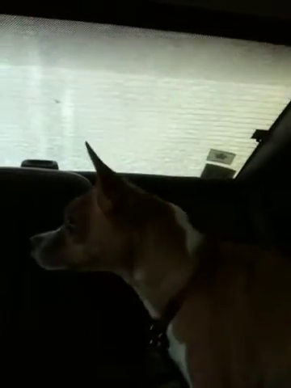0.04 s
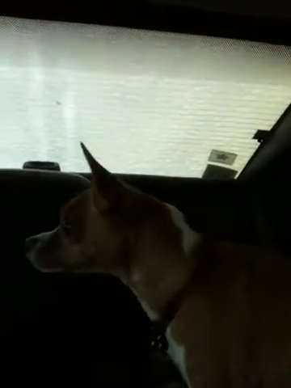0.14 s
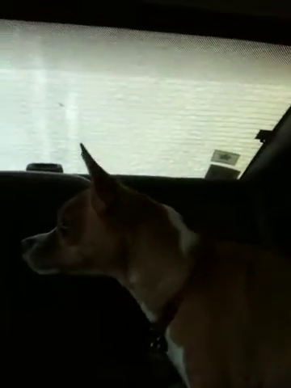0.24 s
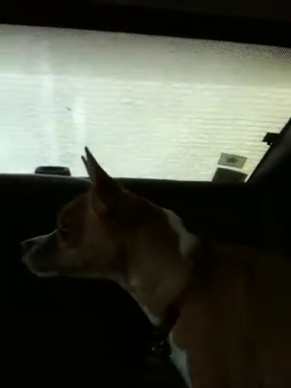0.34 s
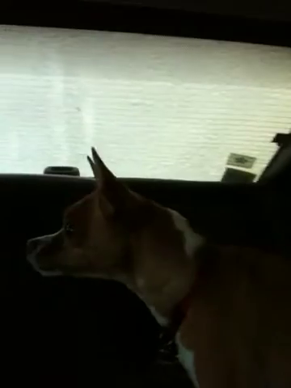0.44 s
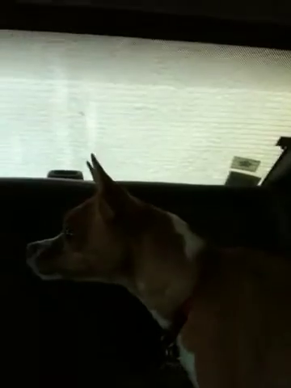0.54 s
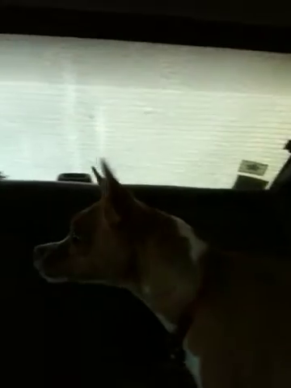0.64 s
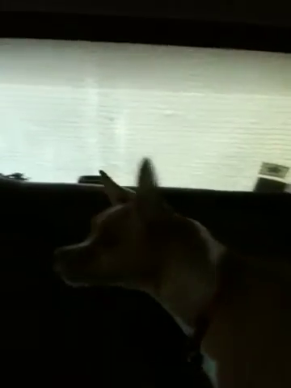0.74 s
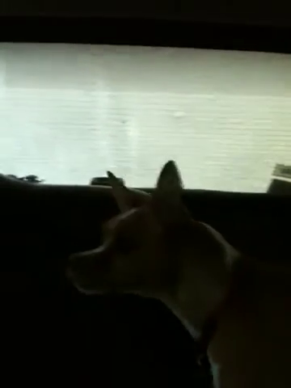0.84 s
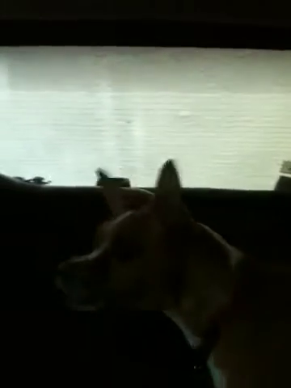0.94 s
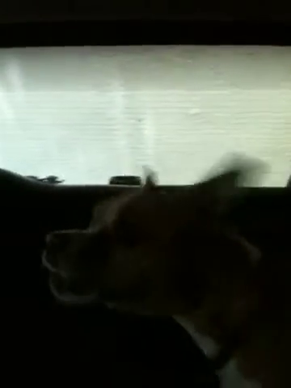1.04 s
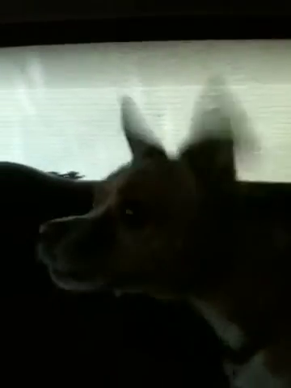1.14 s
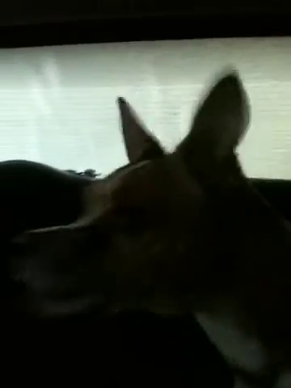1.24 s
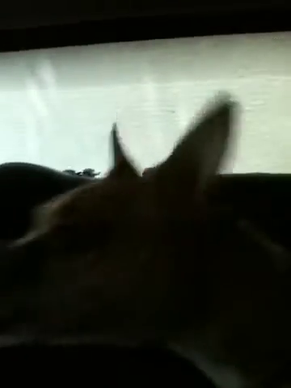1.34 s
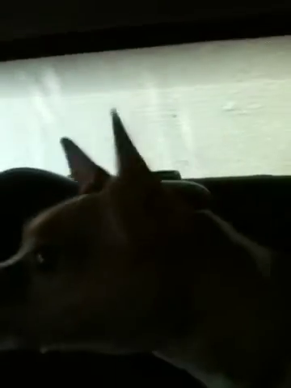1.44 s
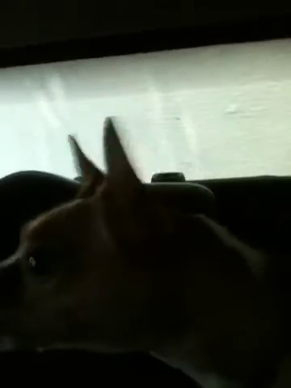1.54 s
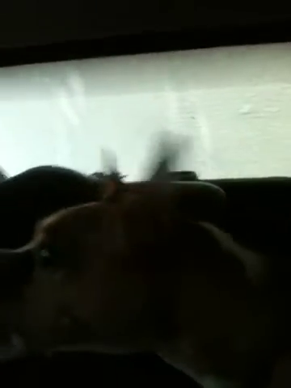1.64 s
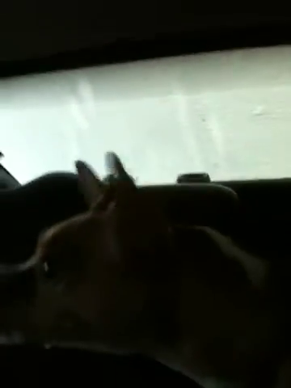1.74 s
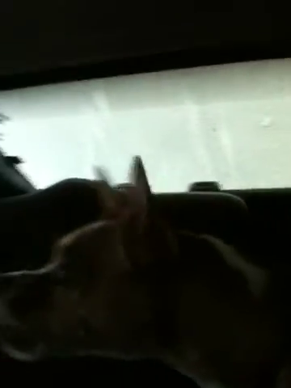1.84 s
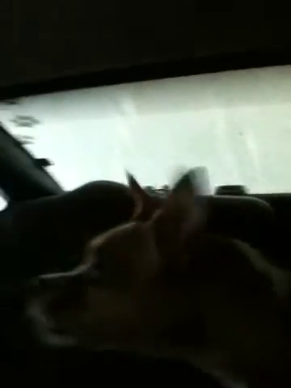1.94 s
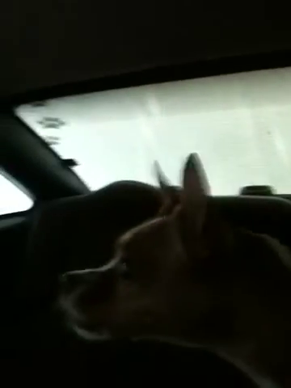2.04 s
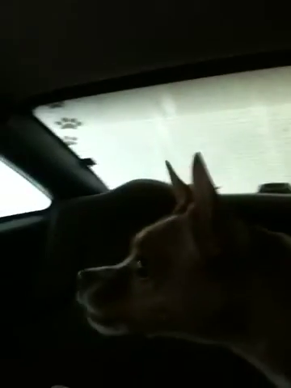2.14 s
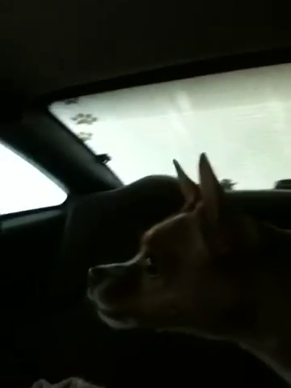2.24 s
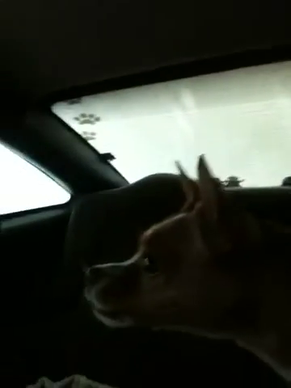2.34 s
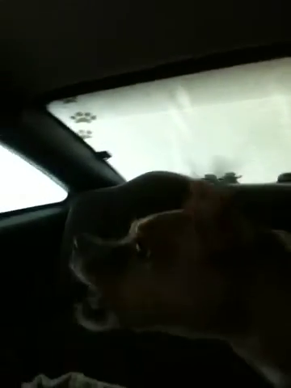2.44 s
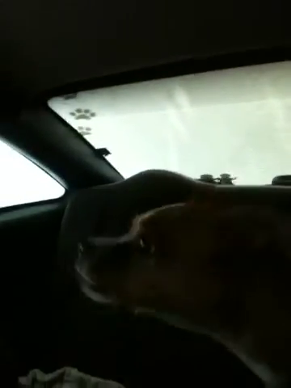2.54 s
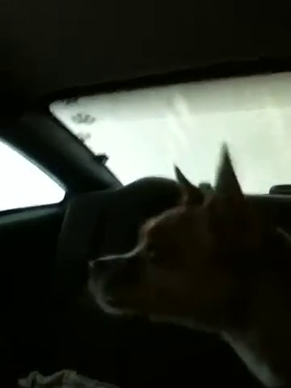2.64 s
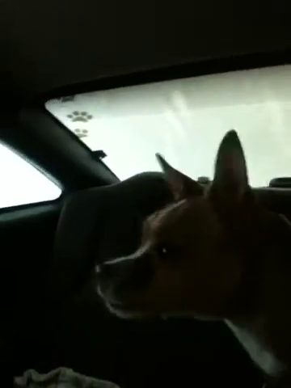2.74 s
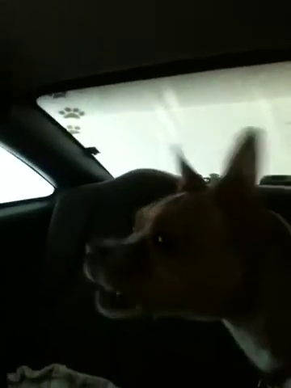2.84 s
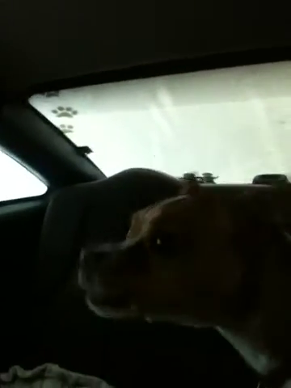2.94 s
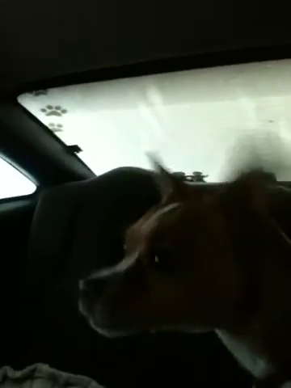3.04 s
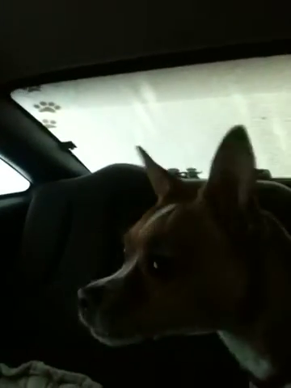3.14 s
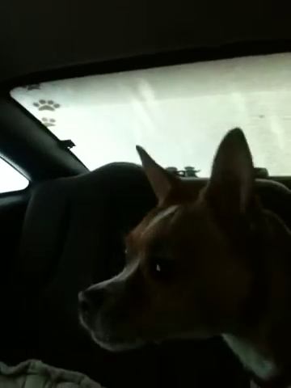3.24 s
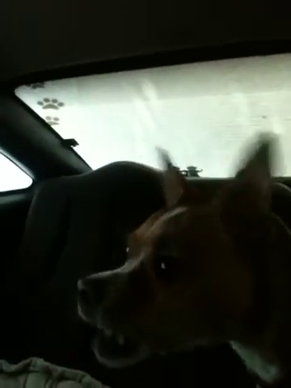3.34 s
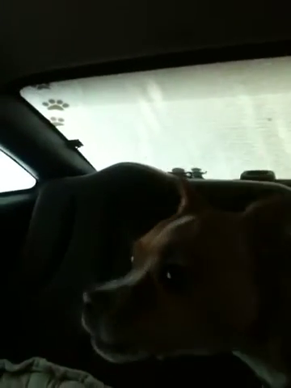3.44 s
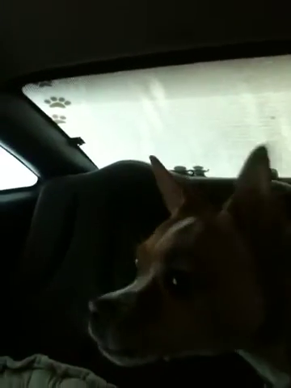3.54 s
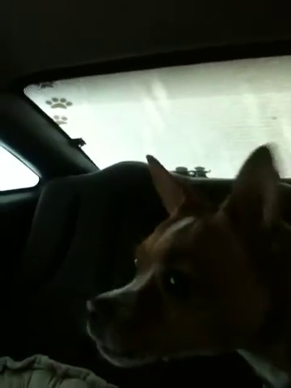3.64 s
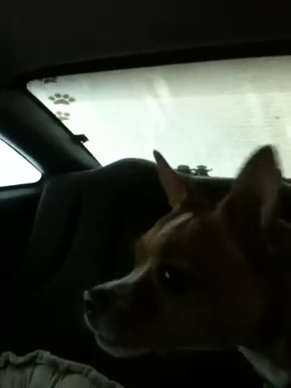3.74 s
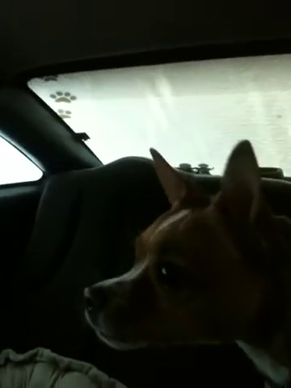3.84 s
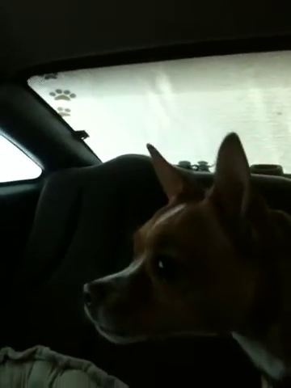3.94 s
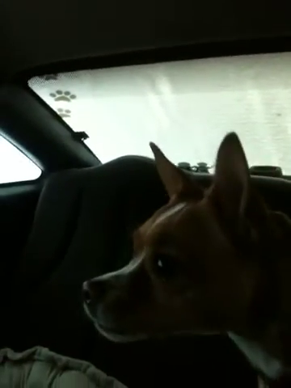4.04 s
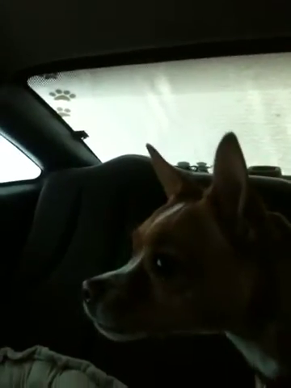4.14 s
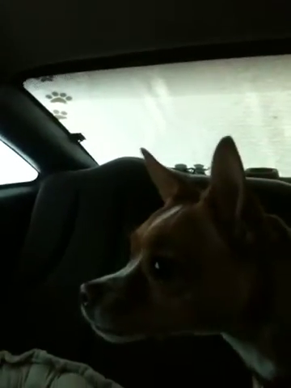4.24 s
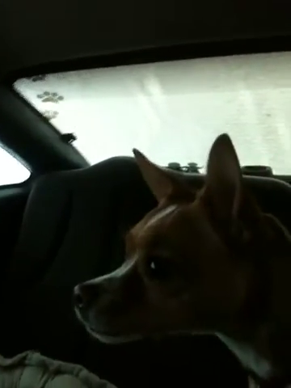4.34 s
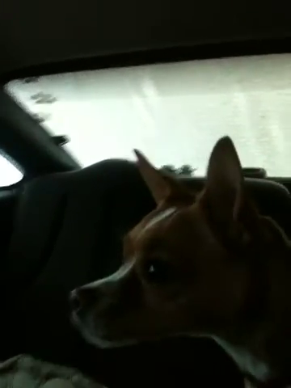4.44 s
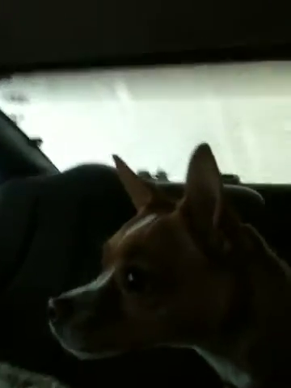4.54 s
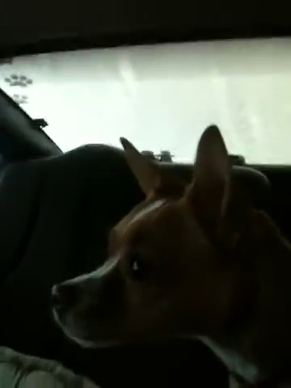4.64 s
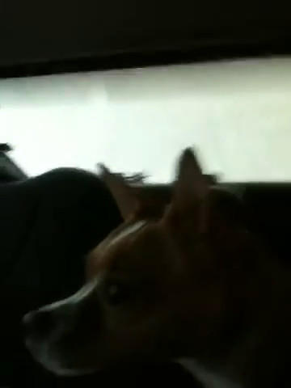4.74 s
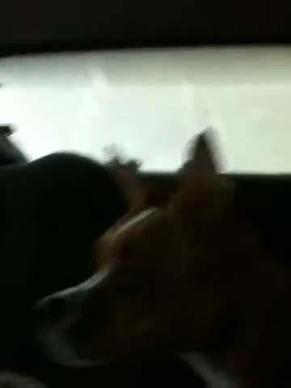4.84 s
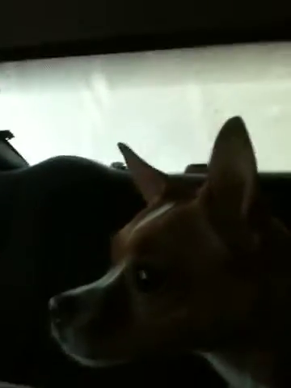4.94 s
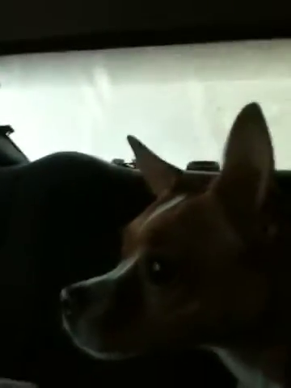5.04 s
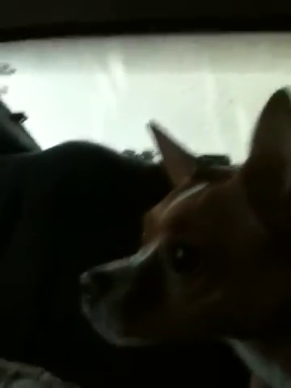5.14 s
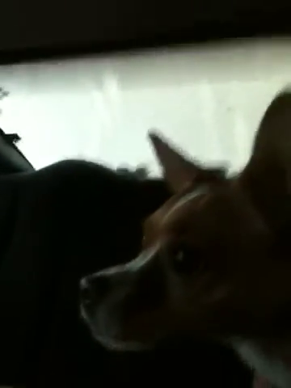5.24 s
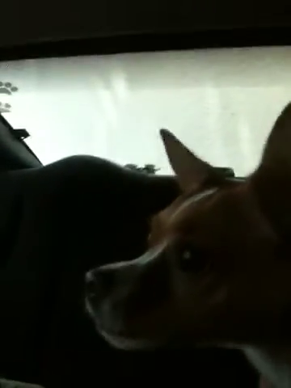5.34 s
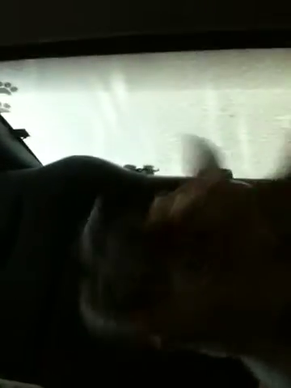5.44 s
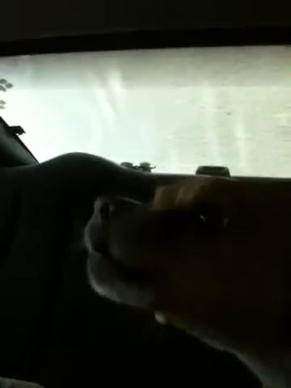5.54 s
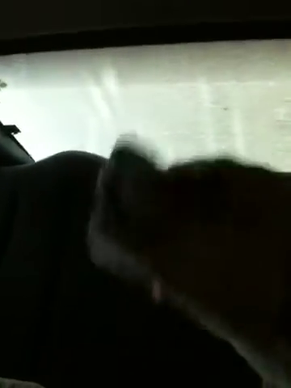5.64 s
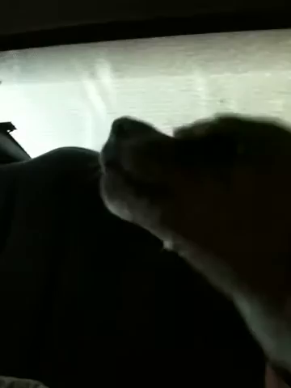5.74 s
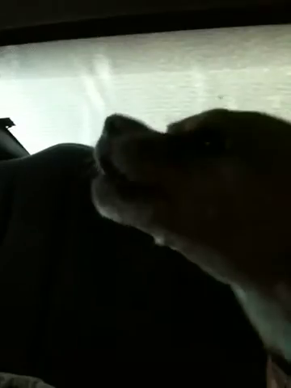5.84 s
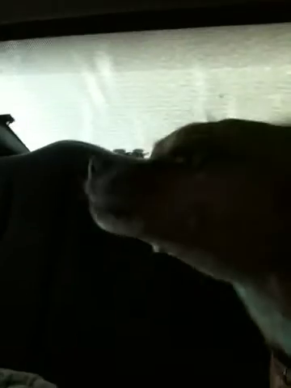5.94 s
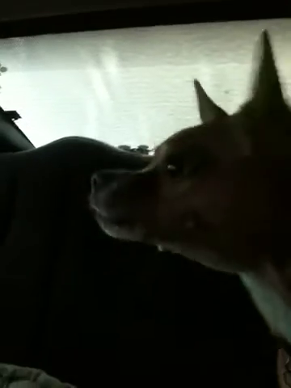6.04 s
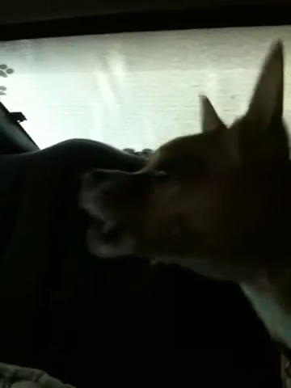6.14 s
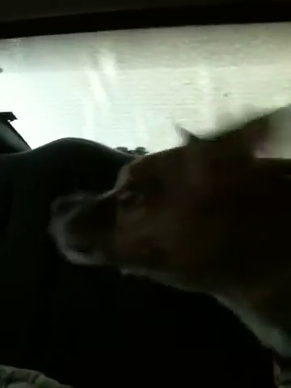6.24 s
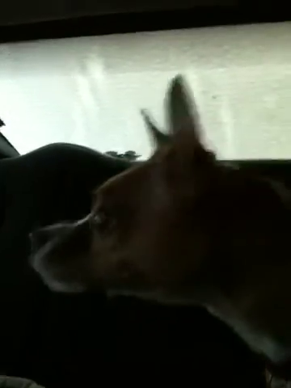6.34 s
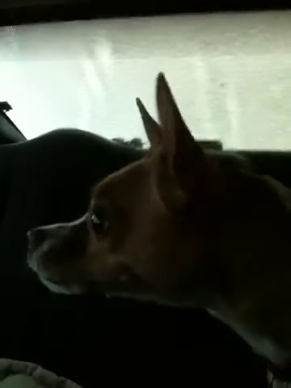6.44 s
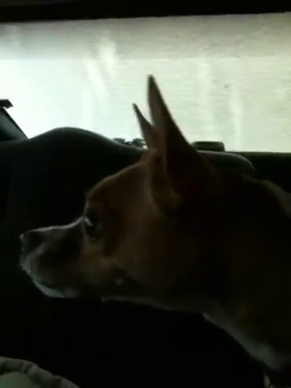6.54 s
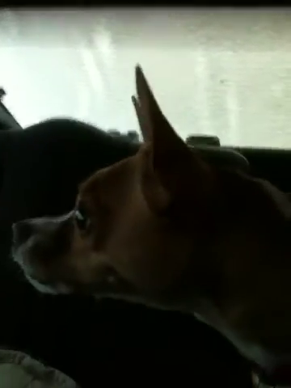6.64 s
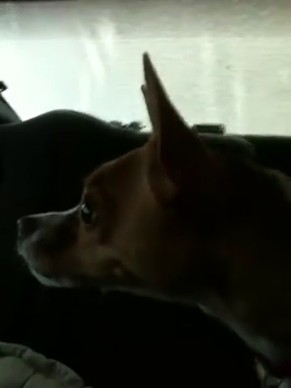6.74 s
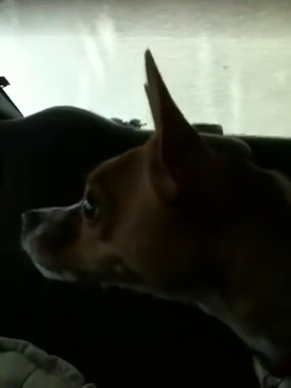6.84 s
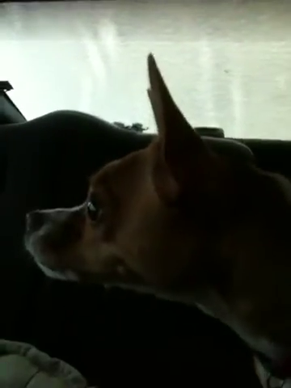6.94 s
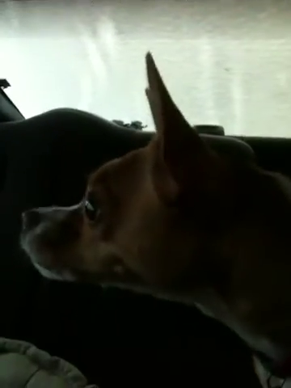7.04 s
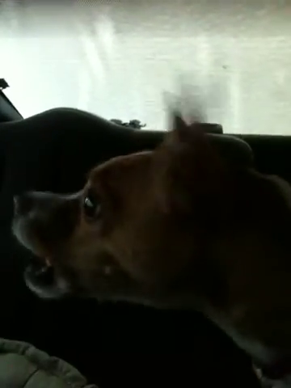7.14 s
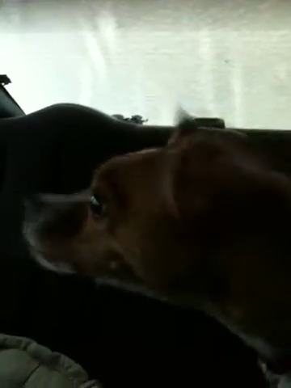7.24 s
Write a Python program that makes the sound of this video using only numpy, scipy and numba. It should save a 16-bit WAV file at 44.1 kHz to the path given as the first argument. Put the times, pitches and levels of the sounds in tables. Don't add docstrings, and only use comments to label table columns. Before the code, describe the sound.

Inside a closed car at a wash, water roars dully through the body and spray drums on the glass over a faint low hum. After a second a small dog growls, then yaps four times, four more after a pause, then a quick cluster and one last yap. The very close phone microphone overloads on each yap, and the small cabin rings briefly.

```python
import sys
import numpy as np
from scipy import signal
from scipy.io import wavfile
from scipy.ndimage import uniform_filter1d, map_coordinates
from numba import njit

SR = 44100
rng = np.random.default_rng(int(sys.argv[2]) if len(sys.argv) > 2 else 0)


def inscribe(sig):
    pcm = np.round(np.clip(np.atleast_2d(sig).T, -1, 1) * 32767)
    wavfile.write(sys.argv[1], SR, pcm.astype(np.int16))


def linear_from_db(decibels):
    return 10 ** (np.asarray(decibels, float) / 20)


N = 320607


def curve(rows):
    t, *columns = np.vstack(rows).T
    return [np.interp(np.arange(N) / SR, t, column) for column in columns]


def level(x, db):
    return x * linear_from_db(db) / np.sqrt(np.mean(x ** 2))


def noise():
    return rng.standard_normal(N)


def butter(x, order, hz, kind="low"):
    return signal.sosfilt(signal.butter(order, hz, kind, fs=SR, output="sos"), x)


@njit
def svf(x, hz, width):
    y = np.empty(len(x))
    b, l, g, k, last = 0., 0., 0., 0., 0.
    for i in range(len(x)):
        if hz[i] != last:
            g, k, last = np.tan(np.pi * hz[i] / SR), width / hz[i], hz[i]
        v = (b + g * (x[i] - l)) / (1 + g * (g + k))
        b, l, y[i] = 2 * v - b, l + 2 * g * v, k * v
    return y


def band(x, hz, width):
    return svf(x + 1e-18, hz + np.zeros(N), float(width))


def steep_band(x, hz, width):
    return band(band(x, hz, width), hz, width)


def modes(x, table):
    return sum((-1) ** k * linear_from_db(db) * band(x, hz, width) for k, (hz, width, db) in enumerate(table))


def walk(rate):
    hold = int(SR / rate)
    steps = np.repeat(rng.standard_normal(N // hold + 1), hold)
    return 1.1 * uniform_filter1d(uniform_filter1d(steps, hold), hold)[:N]


# f/Hz, density/dB per Hz
WASH_SPECTRUM = [(44, -56), (75, -25), (92, -68), (129, -2), (184, 1), (230, -5.5), (276, -6.5),
                 (441, -14.5), (517, -14.5), (707, -11.5), (828, -23), (1590, -18.5), (3250, -29),
                 (9130, -23.5), (16000, -24.5)]
WASH_DB = -40.5


def wash():
    out, swell = 0, walk(0.62)
    hzs, dbs = np.transpose(WASH_SPECTRUM)
    for hz in 40 * 2 ** np.arange(0, 8.4, 1 / 3):
        db = np.interp(np.log(hz), np.log(hzs), dbs) + 0.45 * swell + 0.5 * walk(49)
        out = out + linear_from_db(db) * steep_band(noise(), hz, hz / 3)
    out = butter(out, 3, 11500)
    return level(out, WASH_DB - 2.0)


# start t/s, end t/s, panel f/Hz, width/Hz, start level/dB
SPRAY_JETS = [
    (.55, 3.2, 4200, 2600, -53),
    (0, 4.5, 1550, 400, -51),
    (4.55, 7.3, 2500, 1200, -54),
    (2.3, 4.5, 4330, 250, -60),
]
JET_FADE_DB_S, JET_EDGE_S, JET_TRIM_DB = 1.1, .2, 0.5


def spray():
    out = 0
    for start, end, hz, width, db in SPRAY_JETS:
        end_db = db - JET_FADE_DB_S * (end - start)
        gain_db = curve([[(start - JET_EDGE_S, -90), (start, db), (end, end_db), (end + JET_EDGE_S, -90)]])[0]
        out = out + level(band(noise(), hz, width), 0) * linear_from_db(gain_db + JET_TRIM_DB)
    return out


def pump_hum():
    return level(band(noise(), 56, 4.2), -54.5) * linear_from_db(2.5 * walk(2.2))


def folds(hz, rough, alternate, jitter, shimmer_db, rate, breath, slope, count):
    phase = np.cumsum(np.pi * hz * (1 + jitter * rough * walk(rate)) / SR)
    even = sum(np.sin(k * phase) * np.exp(-slope * np.log(k / 2)) for k in range(2, count, 2))
    odd = sum(np.sin(k * phase) * np.exp(-slope * np.log(k / 2 + 1)) for k in range(1, count, 2))
    air = (1 + np.cos(2 * phase)) * noise()
    shimmer = linear_from_db(shimmer_db * rough * walk(rate))
    return shimmer * (even + alternate * odd) + breath * rough ** .7 * air


# start t/s, end t/s, pitch f/Hz, level/dB, fall over the bout/dB
GROWL_BOUTS = [
    (0.954, 1.921, 190, -30, -7.5),
    (2.457, 3.865, 178, -29.5, -4.5),
    (5.389, 5.425, 170, -40, 0),
    (6.077, 6.554, 165, -30.5, 4.5),
]
# f/Hz, width/Hz, level/dB
GROWL_THROAT_MODES = [(199.5, 150, 0), (339, 107, 6.5), (530, 132, -2), (695, 122, -3), (1223, 123, -5.5),
                      (1520, 130, -15.5)]
GROWL_SWELL_S, GROWL_FADE_S = 0.0452, .3


def growl(yap):
    rows = []
    for start, end, hz, top, fall in GROWL_BOUTS:
        rows += [(start - GROWL_SWELL_S, hz, -70), (start, hz, top)]
        rows += [(end, hz, top - fall), (end + GROWL_FADE_S, hz, -70)]
    hz, db = curve([rows])
    hz = hz * (1 + .025 * walk(5))
    db = db + 2.0 * walk(6.27)
    rough = curve([[(2.4, .75), (2.7, .5), (4, .5), (5, .8)]])[0]
    source = folds(hz, rough, .25, jitter=.14, shimmer_db=7.0, rate=90, breath=5.5, slope=.35, count=24)
    silent = 1 / (1 + uniform_filter1d(yap ** 2, size=700) / linear_from_db(-7.5) ** 2)
    return level(modes(source, GROWL_THROAT_MODES), 0) * linear_from_db(db) * silent


# full voice from t/s, until t/s, lung effort level/dB, attack/s, release/s
YAP_BREATHS = [(1.047, 1.192, -2, .035, .045), (1.343, 1.467, -2.5, 0.056, .035),
               (1.65, 1.794, -3.5, .04, .035), (1.916, 2.013, -4, 0.053, .035),
               (2.491, 2.612, -2.5, 0.04, .04), (2.906, 3.036, -2, 0.039, .035),
               (3.386, 3.511, -2.5, .03, .045), (3.754, 3.819, -7.5, 0.049, .035),
               (5.508, 5.614, -1.5, .02, .04), (5.687, 5.795, -1, .04, .04), (5.892, 6.004, -4.5, .05, .05),
               (6.206, 6.309, -2.5, .06, .04), (7.203, 7.29, -1, .035, .04)]
LINK_S, LINK_DIP_DB = .12, 10.5
QUIET_DB, RISE_DB, SAG_DB = -34, 2.5, 2.5
HALFWAY_DB = -16


def linked(k):
    return k > 0 and YAP_BREATHS[k][0] - YAP_BREATHS[k - 1][1] < LINK_S


def effort():
    rows = []
    for k, (on, off, db, attack, release) in enumerate(YAP_BREATHS):
        if linked(k):
            rows[-3:] = [((on + YAP_BREATHS[k - 1][1]) / 2, db - LINK_DIP_DB)]
        else:
            rows += [(on - attack - .015, -70), (on - attack, QUIET_DB), (on - attack / 2, db + HALFWAY_DB)]
        rows += [(on, db - RISE_DB), ((on + off) / 2, db), (off, db - SAG_DB)]
        rows += [(off + release / 2, db + HALFWAY_DB), (off + release, QUIET_DB), (off + release + 0.017, -70)]
    return curve([rows])[0]


# first breath f/Hz, full voice f/Hz, crest t/s, crest f/Hz, letting go f/Hz
PITCH_ARCHES = [(558.9, 740, 1.125, 910, 700), (601.3, 650, 1.413, 1055, 730),
                (599.8, 625, 1.724, 951, 670), (529, 640, 1.98, 862, 730), (586.5, 850, 2.545, 1340, 790),
                (650.8, 740, 2.976, 1093, 730), (611.8, 730, 3.454, 1040, 700),
                (501.3, 600, 3.786, 649, 525), (777.5, 860, 5.585, 870, 1140),
                (888.4, 1080, 5.739, 1183, 1030), (760.3, 830, 5.952, 951, 750), (479, 790, 6.26, 871, 680),
                (638, 870, 7.246, 1185, 1200)]
SLACK_END_HZ = 489.7
SLACKEN = .7


def pitch():
    rows = []
    for k, (breath, arch) in enumerate(zip(YAP_BREATHS, PITCH_ARCHES)):
        on, off, _, attack, release = breath
        first_hz, on_hz, crest, crest_hz, off_hz = arch
        if linked(k):
            rows.pop()
        rows += [(on - attack, first_hz), (on, on_hz), (crest, crest_hz)]
        rows += [(off, off_hz), (off + SLACKEN * release, SLACK_END_HZ)]
    t, hz = np.transpose(rows)
    place = np.interp(np.arange(N) / SR, t, np.arange(len(t)))
    arched = map_coordinates(hz, [place], order=2, mode="nearest")
    return uniform_filter1d(arched, size=500)


# t/s, roughness before/0-1, after/0-1,
# strong-weak alternation before/0-1, after/0-1
FOLD_GAITS = [(1.14, .95, .6, .45, .5), (1.39, .65, .25, .3, .6), (1.715, .5, .26, .15, .15),
              (1.93, .25, .1, 0, 0), (2.575, 1.2, .5, .4, .2), (2.95, .55, .2, .15, .4),
              (3.44, .6, .2, .3, .12), (3.765, .2, .06, .1, 0), (5.59, .5, .35, .3, .6),
              (5.7, .3, .05, .35, .5), (5.892, .0, .22, 0, .7), (6.255, .42, .14, .35, 0),
              (7.238, .45, .06, .2, .5)]
GAIT_CHANGE_S, FRAY, LAST_ALTERNATION = .02, .15, .1


def gait():
    rows = []
    for (on, off, _, attack, _), (t, rough, smooth, pairs, pairs_after) in zip(YAP_BREATHS, FOLD_GAITS):
        rows += [(on - attack, rough, pairs), (t - GAIT_CHANGE_S / 2, rough, pairs)]
        rows += [(t + GAIT_CHANGE_S / 2, smooth, pairs_after), (off - GAIT_CHANGE_S, smooth, pairs_after)]
        rows += [(off + GAIT_CHANGE_S, smooth + FRAY, min(pairs_after, LAST_ALTERNATION))]
    return curve([rows])


# mouth f/Hz, mouth level/dB, lips f/Hz, lips level/dB
JAW_POSES = [(1797, 7.5, 2500, 7), (1860, 5.5, 2670, 13.5), (1640, 2, 2730, 8), (1630, -4.5, 2300, -9.5),
             (1740, 1.5, 2740, -2), (1700, 3.5, 2660, 16), (1970, 1.5, 2695, 9), (1280, 9.5, 1874, 1),
             (1485.6, -1, 2560, 12.5), (1800, -0.5, 2340, 18.5), (1470, 9, 2230, 18), (1717, 3.5, 2494, 4),
             (1830, 5.5, 2630, 10.5)]
# f/Hz, width/Hz, level/dB
THROAT_MODES = [(730, 740, 7.5), (4000, 92, -26.5), (4900, 270, -34)]
# f/Hz, width/Hz, level/dB
TEETH_MODES = [(6660, 660, -20), (8950, 1900, -10), (11500, 1300, -12.5)]
JAW_LEAD_S = .03
SHUT_MOUTH_HZ, SHUT_MOUTH_DB, SHUT_LIPS_SHARE, SHUT_LIPS_DB = 1297, -3, 0.81, -32.5
PHARYNX_HZ, PHARYNX_WIDTH_HZ, PHARYNX_DB, TEETH_VOICED_DB = 4390, 607, 1, -3.5
MUZZLE_TOP_HZ = 3380
KNEE_DB, OVERDRIVE = -6.5, 1.9


def jaws(hz):
    held = []
    for (on, off, *_), arch, pose in zip(YAP_BREATHS, PITCH_ARCHES, JAW_POSES):
        held += [(t, arch[3]) + tuple(pose) for t in (on, off - JAW_LEAD_S)]
    crest_hz, mouth_hz, mouth_db, lips_hz, lips_db = curve([held])
    shut = np.clip((crest_hz - hz) / (crest_hz - SLACK_END_HZ), 0, 1)
    mouth_hz = mouth_hz + shut * (SHUT_MOUTH_HZ - mouth_hz)
    mouth_db = mouth_db + SHUT_MOUTH_DB * shut
    lips_hz = lips_hz * (1 - shut * (1 - SHUT_LIPS_SHARE))
    lips_db = lips_db + SHUT_LIPS_DB * shut
    return mouth_hz, mouth_db, lips_hz, lips_db


def yaps():
    hz, db = pitch(), effort()
    mouth_hz, mouth_db, lips_hz, lips_db = jaws(hz)
    slope = np.clip(.6 - 0.12 * (db + 7.0), .3, 2.5)
    rough, alternate = gait()
    source = folds(hz, rough, alternate, jitter=.13, shimmer_db=7.0, rate=220, breath=1.1, slope=slope, count=26)
    mouth = linear_from_db(mouth_db + 7.5) * steep_band(source, mouth_hz, 674)
    lips = linear_from_db(lips_db + 4.5) * steep_band(source, lips_hz, 517)
    throat = linear_from_db(-12.0 * rough) * modes(source, THROAT_MODES)
    muzzle = butter(throat - mouth + lips, 2, MUZZLE_TOP_HZ)
    pharynx = linear_from_db(PHARYNX_DB) * steep_band(source, PHARYNX_HZ, PHARYNX_WIDTH_HZ)
    teeth = linear_from_db(TEETH_VOICED_DB) * modes(source, TEETH_MODES)
    voice = butter(muzzle + pharynx + teeth, 2, 440, "high")
    voice = voice / np.sqrt(uniform_filter1d(voice ** 2, size=2048))
    hiss = linear_from_db(1.0 * np.minimum(db - 3.0, 0)) * modes(noise(), TEETH_MODES)
    return (voice + hiss) * linear_from_db(db + OVERDRIVE * np.maximum(db - KNEE_DB, 0))


# f/Hz, width/Hz, level/dB
CABIN_MODES = [(788, 80, -7.5), (1273.4, 22.8, 2.5), (1531, 102, -5), (1702, 34, 5.5), (2290, 91, -16),
               (2626, 93, 4.5), (3668, 138, 7.5), (4245, 190, 2)]
CABIN_T60_S, CABIN_TAIL_DB = 0.037, -7


def cabin(dog):
    t = np.arange(SR // 8) / SR
    scatter = rng.standard_normal(len(t)) * (t > .002) * linear_from_db(-60 * t / CABIN_T60_S)
    tail = signal.fftconvolve(dog, scatter / np.linalg.norm(scatter))[:N]
    return .5 * dog + 0.56 * modes(dog, CABIN_MODES) + linear_from_db(CABIN_TAIL_DB) * tail


# t/s, peak level/dB, f/Hz
TAG_TICKS = [
    (6.4336, -26, 2120),
    (6.4984, -38, 3060),
    (6.6722, -39, 2290),
]


def tag_ticks():
    out, t = np.zeros(N), np.arange(N) / SR
    for start, db, hz in TAG_TICKS:
        burst = (t > start) * np.exp(-np.abs(t - start) / 0.02) * noise()
        out += linear_from_db(db + 9) * band(burst, hz, 0.13 * hz)
    return out


def scene():
    outside = wash() + spray() + pump_hum()
    yap = yaps()
    mono = outside + cabin(yap + growl(yap)) + tag_ticks()
    return np.array([mono, mono])


def low_pass(x):
    return signal.sosfilt(signal.butter(12, 16380, fs=SR, output="sos"), x)


CLIP_LEVEL, CORNER = .63, 7.0
LIMIT_TOP = .66


def record(dry):
    x = butter(dry[0], 1, 60, "high") / CLIP_LEVEL
    x = CLIP_LEVEL * x / (1 + np.abs(x) ** CORNER) ** (1 / CORNER)
    x = butter(x, 1, 135, "high")
    x = np.clip(x, -LIMIT_TOP, LIMIT_TOP)
    treble = butter(x, 8, 5500, "high")
    loud = uniform_filter1d(np.abs(x), size=512) > .2
    side = linear_from_db(-18) * walk(300) * treble * loud
    return low_pass(np.array([x + side, x - side]))


dry = scene()
out = record(dry)
inscribe(out)
```